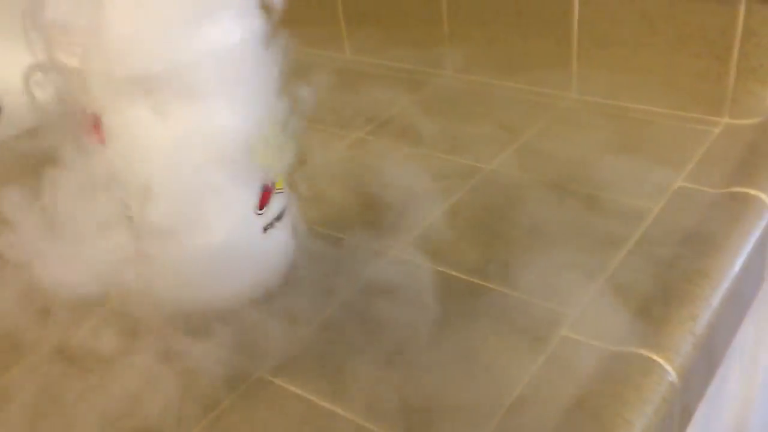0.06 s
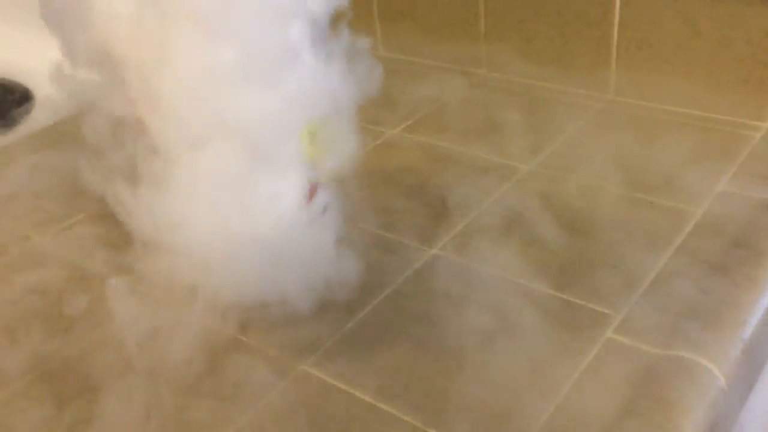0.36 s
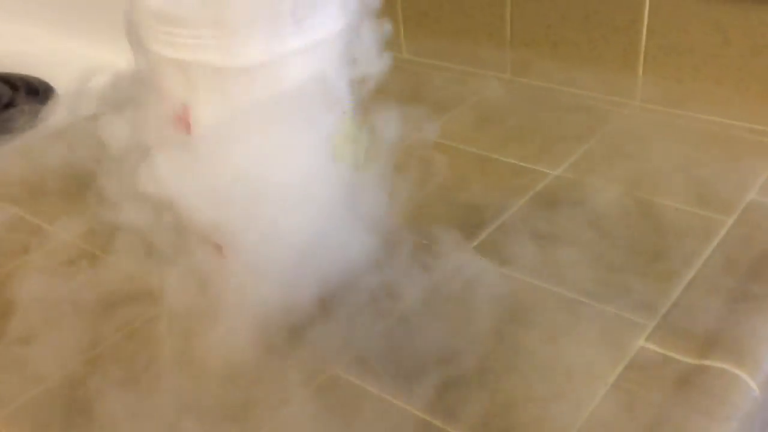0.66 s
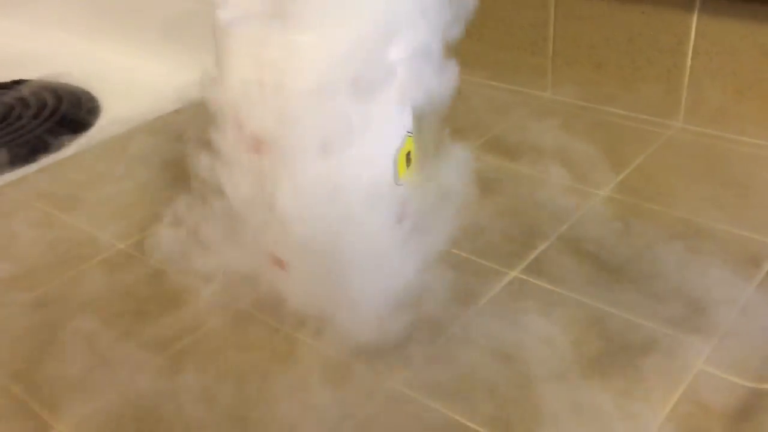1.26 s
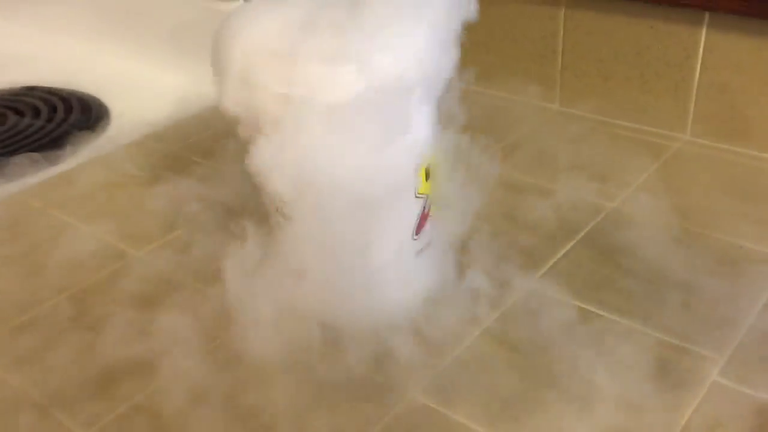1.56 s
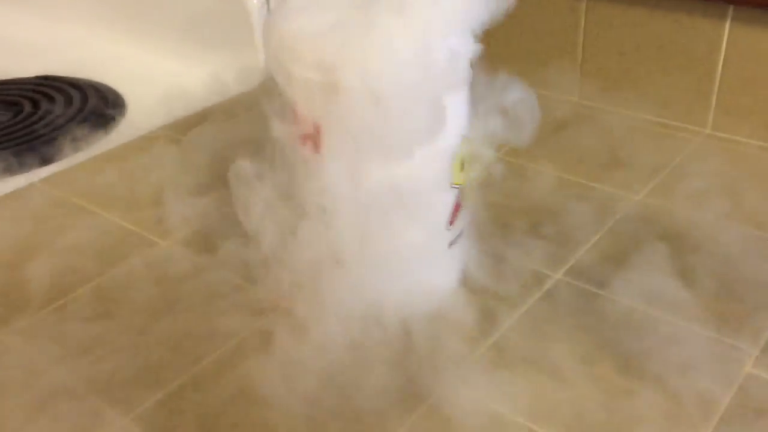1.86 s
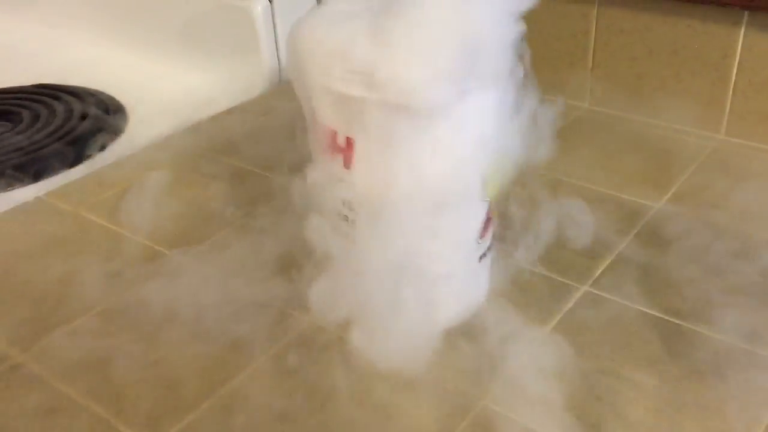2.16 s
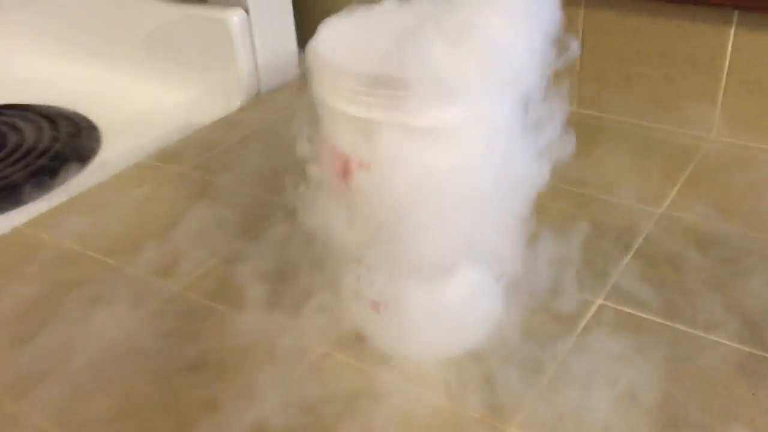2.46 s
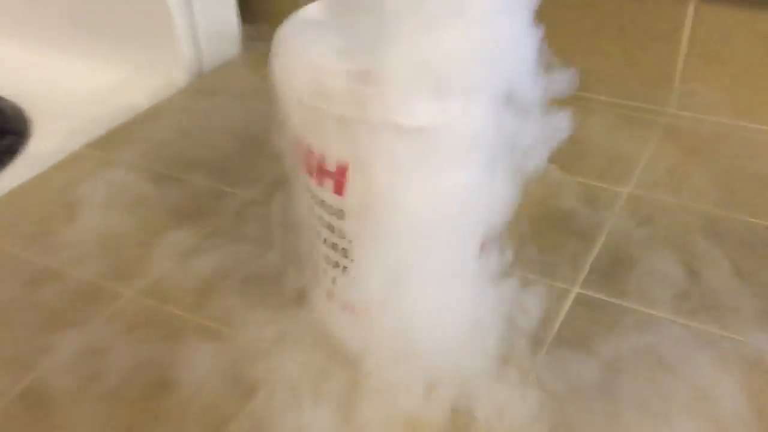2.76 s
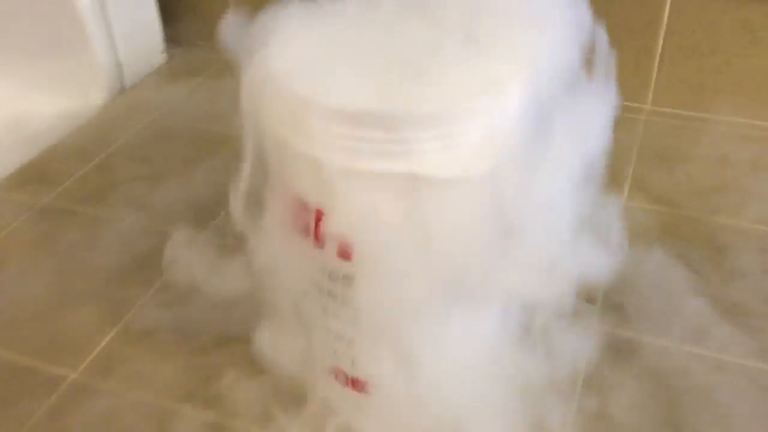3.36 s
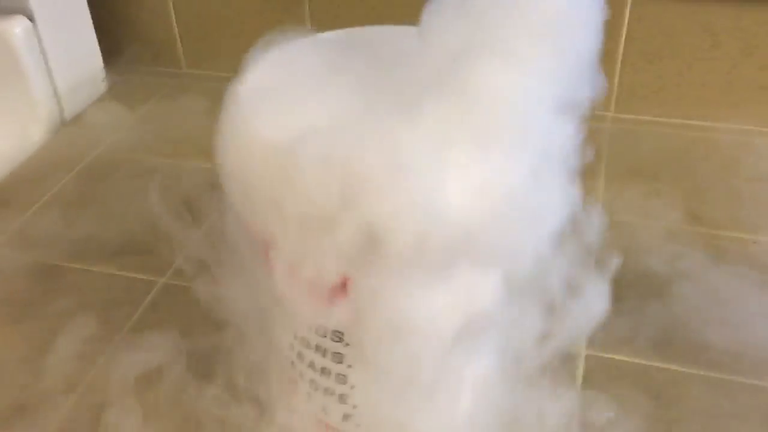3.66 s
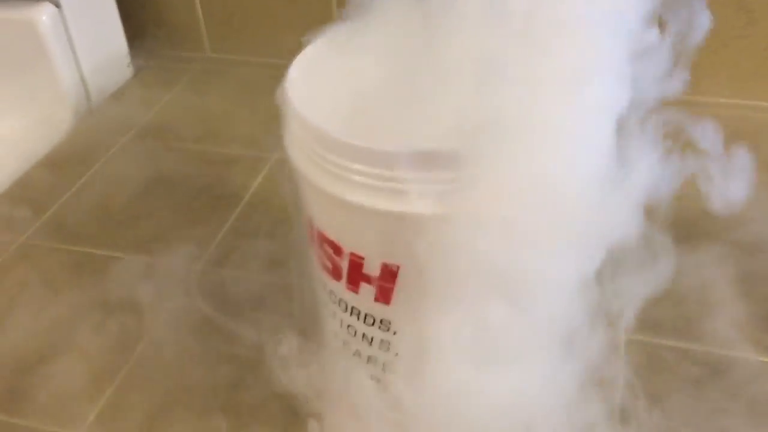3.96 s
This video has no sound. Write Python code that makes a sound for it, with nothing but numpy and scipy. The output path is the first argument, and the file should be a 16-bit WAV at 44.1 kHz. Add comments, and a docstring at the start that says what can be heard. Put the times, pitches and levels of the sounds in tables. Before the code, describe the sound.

Dry ice bubbles continuously in a small plastic bucket of water. Irregular hollow plops stand out from a fine simmer with tiny pops and ticks, over a soft rumble and hiss, heard close in a kitchen.

```python
"""Dry ice bubbles in a small plastic bucket of water on a tiled kitchen counter.
Large gas bubbles burst in short rising plops that make the air in the bucket ring.
Smaller ones simmer between them, bursts throw spatters of tiny pops, and films and droplets tick.
Churning water rumbles softly under a steady hiss, and the kitchen adds a short echo."""
import sys
import numpy as np
from scipy import signal
from scipy.fft import rfft, irfft
from scipy.io import wavfile

SR = 44100
rng = np.random.default_rng(int(sys.argv[2]) if len(sys.argv) > 2 else 0)


def dump(signal):
    """Clip the signal to [-1, 1] and save it as 16-bit WAV at the path in sys.argv[1]."""
    limited = np.clip(np.atleast_2d(signal).T, -1, 1)
    pcm = np.round(limited * 32767).astype(np.int16)
    wavfile.write(sys.argv[1], SR, pcm)


N = 176400
T = np.arange(N) / SR

# low notes of the bucket and counter: pitch_hz, width_hz, level_db
RUMBLE_NOTES = [(64, 20.6, -68.5), (74.3, 11, -67), (119, 10.2, -66.5), (149.7, 10.3, -67),
                (194, 47.5, -69.5), (350, 266, -69)]
# how the deepest of those notes swell and fade: time_s, gain_db
DEEP_SWELL = [(0, -2), (.9, 5), (2.6, 2), (4, -4.5)]
# tone of the background hiss: pitch_hz, gain_db
HISS_TONE = [(30, -28), (250, -2), (450, 0), (650, 0), (850, -5), (2000, -10), (4000, -16), (6000, -20),
             (9500, -22), (12000, -25), (16000, -28)]
# how strongly the small bubbles simmer: time_s, gain_db
SIMMER_STRENGTH = [(0, 0), (.55, -3.5), (.85, -4), (1.15, -2.5), (1.45, 0), (2.2, 2.5), (3.1, -3),
                   (3.33, -1), (3.55, 3.5), (4, 2.5)]
# sharp snaps of films and droplets: start_s, pitch_hz, level_db
FILM_SNAPS = [(0.129, 9300, -56), (0.2468, 5500, -54.5), (0.3285, 9400, -56), (0.3564, 6100, -52.5),
              (0.361, 12400, -51.5), (0.378, 5240, -60.5), (0.546, 6050, -61), (0.689, 7900, -64.5),
              (0.957, 5430, -56), (1.2413, 6200, -58), (1.413, 5550, -55), (1.426, 6600, -55.5),
              (1.538, 8900, -61.5), (1.661, 3940, -51), (1.6643, 12300, -60.5), (1.817, 6500, -60.5),
              (1.871, 9600, -65.5), (2.151, 9200, -61.5), (2.217, 8000, -55.5), (2.297, 8900, -61.5),
              (3.05, 8250, -50), (3.223, 6650, -57.5), (3.406, 9500, -50.5), (3.414, 12500, -65),
              (3.552, 9200, -60), (3.652, 8250, -57.5), (3.886, 8300, -54)]
# large bubbles bursting at the surface: start_s, pitch_hz, level_db (before PLOP_GAIN_DB), swell_s
LARGE_BUBBLES = [(0.2496, 2820, -37.5, 0.00049), (0.3213, 706, -43, 0.0046), (0.3718, 639, -28.5, 0.0032),
                 (0.378, 3750, -41.5, 0.0009), (0.4745, 738, -43.5, 0.0016), (0.483, 1760, -55, 0.002),
                 (0.5028, 480, -43.5, 0.0013), (0.5265, 618, -42.5, 0.0018), (0.591, 784, -44.5, 0.0016),
                 (0.6163, 2620, -43, 0.00028), (0.6591, 1242, -38.5, 0.0013), (0.6698, 630, -42.5, 0.0039),
                 (0.7141, 627, -37, 0.0029), (0.8742, 627, -43.5, 0.0014), (1.02, 649, -48, 0.0064),
                 (1.109, 1180, -58.5, 0.002), (1.178, 4450, -51, 0.0016), (1.3118, 675, -38, 0.0011),
                 (1.325, 960, -51.5, 0.0032), (1.4448, 623, -45.5, 0.0033), (1.6142, 3370, -47, 0.00065),
                 (1.6123, 2430, -45.5, 0.0041), (1.7283, 1967, -46.5, 0.0033), (1.8171, 595, -47.5, 0.0049),
                 (1.844, 706, -33.5, 0.0018), (2.031, 1470, -32, 0.00083), (2.2509, 608, -37, 0.0026),
                 (2.3078, 676, -43.5, 0.0023), (2.3835, 712, -44, 0.0016), (2.4835, 1610, -46, 0.0012),
                 (2.484, 1040, -41.5, 0.0013), (2.5364, 715, -46.5, 0.0019), (2.6207, 655, -35, 0.0037),
                 (2.622, 950, -40.5, 0.0005), (2.702, 2910, -50, 0.0015), (2.7258, 960, -37.5, 0.001),
                 (2.7258, 688, -30, 0.0033), (2.9168, 606, -38, 0.0017), (3.0046, 1116, -41.5, 0.0013),
                 (3.0485, 2570, -43.5, 0.00092), (3.1097, 3270, -39.5, 0.00015),
                 (3.114, 4180, -48.5, 0.0013), (3.1211, 1270, -36, 0.0016), (3.1218, 643, -39, 0.00105),
                 (3.1864, 344, -41.5, 0.0012), (3.2363, 590, -40, 0.0022), (3.4041, 1000, -45.5, 0.0017),
                 (3.4657, 970, -44, 0.0014), (3.4973, 2640, -36, 0.00056), (3.5542, 646, -39.5, 0.0031),
                 (3.5711, 1050, -37.5, 0.0023), (3.6549, 2790, -43.5, 0.00046),
                 (3.652, 1060, -42.5, 0.0014), (3.6991, 905, -46.5, 0.00097), (3.7573, 940, -41, 0.0021),
                 (3.8474, 1120, -38, 0.0012), (3.8736, 635, -38, 0.0024), (3.9483, 664, -46, 0.0044)]
# spatters of tiny pops: middle_s, pitch_hz, top_level_db
POP_SPATTERS = [(0.582, 3800, -48.5), (0.98, 3860, -52), (1.428, 2650, -45.5), (1.848, 1250, -48.5),
                (2.05, 3700, -46.5), (2.258, 3200, -50), (2.459, 1670, -53), (2.633, 4900, -49.5),
                (2.743, 4520, -53.5), (2.852, 5300, -43.5), (3.001, 1476, -48), (3.219, 4740, -45.5),
                (3.622, 3160, -49), (3.758, 2810, -48.5), (3.963, 4330, -51.5)]
# ringing notes of the air in the bucket: pitch_hz, width_hz, gain_db
BUCKET_NOTES = [(666.3, 32.4, -1), (1943, 360, -6), (2723, 33, 0.5), (3760, 166, 2)]

PLOP_GAIN_DB, PLOP_LOW_HZ = 2.5, 290   # the bubbles give off little sound below this pitch
SWELL_SHAPE, FADE_SHAPE = 0.44, 1.31   # curves of a bubble's rise and fall in loudness
POP_GLIDE, SIMMER_GLIDE = 0.016, 0.023   # share of the pitch gained per swell time
SMALL_FLUTTER_RAD = 0.55   # random wobble that makes small bubbles sound rough


def from_db(db):
    """Turn decibels into a number to multiply a sound by."""
    return 10 ** (np.asarray(db) / 20)


def rms_one(x):
    """Scale a sound so its average strength (rms) is 1."""
    return x / np.sqrt(np.mean(x ** 2) + 1e-20)


def add(out, start_s, sound):
    """Mix a sound in at the given time."""
    i = int(np.clip(start_s * SR, 0, N - 1))
    out[i:i + len(sound)] += sound[:N - i]


def resonance(x, hz, width_hz):
    """Let a sound ring at one pitch; a narrower width rings longer."""
    r = np.exp(-np.pi * width_hz / SR)
    feedback = [1, -2 * r * np.cos(2 * np.pi * hz / SR), r * r]
    return signal.lfilter(np.array([1, 0, -1]) * (1 - r * r) / 2, feedback, x + 1e-18)


def rumble(deep_below_hz=105):
    """Churning water shakes the bucket and counter at their low notes."""
    out = np.zeros(N)
    deep_db = np.interp(T, *np.transpose(DEEP_SWELL))
    for hz, width_hz, db in RUMBLE_NOTES:
        churn = resonance(rng.standard_normal(N), hz, 2 * width_hz)
        note = rms_one(resonance(churn, hz, 2 * width_hz))
        out += from_db(db + deep_db * (hz < deep_below_hz)) * note
    return signal.sosfilt(signal.butter(2, 30, "high", fs=SR, output="sos"), out)


def hiss(level_db=-70.5):
    """A far wash of water and room air makes a soft, steady noise."""
    hz, db = np.transpose(HISS_TONE)
    gain = from_db(np.interp(np.log(np.fft.rfftfreq(N, 1 / SR) + 1), np.log(hz), db))
    # turn the tone curve into a filter that rings only after a sound, never before
    cepstrum = irfft(np.log(gain), N)
    cepstrum[1:N // 2] *= 2
    cepstrum[N // 2 + 1:] = 0
    spectrum = rfft(rng.standard_normal(N)) * np.exp(rfft(cepstrum))
    return from_db(level_db) * rms_one(irfft(spectrum, N))


def bubble(hz, swell_s, glide, flutter_rad):
    """One bursting bubble swells as its cap opens, rises in pitch and dies away."""
    age = np.arange(int(6 * swell_s * SR) + 2) / (swell_s * SR)   # 1 at the loudest moment
    loudness = age ** SWELL_SHAPE * np.exp(SWELL_SHAPE / FADE_SHAPE * (1 - age ** FADE_SHAPE))
    wobble = flutter_rad * np.interp(age, np.arange(12) / 2, rng.standard_normal(12))
    rising_hz = hz * (1 + glide * (age - 1))
    return loudness * np.sin(2 * np.pi * np.cumsum(rising_hz) / SR + wobble)


def simmer(count, centre_hz, octaves, db, cycles, trailing=0, steady=False, trail_s=0.025, spread_db=7):
    """Small bubbles burst at random; the trailing share comes just after the large ones."""
    out = np.zeros(N)
    for when, pitch, strength, length, rise, late in rng.uniform(-1, 1, (count, 6)):
        start_s = (when + 1) / 2 * N / SR
        if abs(late) < trailing:
            plop_s = LARGE_BUBBLES[int(abs(when) * len(LARGE_BUBBLES))][0]
            start_s = plop_s + trail_s * abs(late) / trailing
        hz = centre_hz * 2 ** (octaves * pitch)
        gain = from_db(db + spread_db * strength * abs(strength)) * np.sqrt(centre_hz / hz)
        if not steady:
            gain *= from_db(np.interp(start_s, *np.transpose(SIMMER_STRENGTH)))
        swell_s = cycles * 2 ** length / hz
        glide = SIMMER_GLIDE * (1 + 2 * rise)   # a few slide down instead
        add(out, start_s, gain * bubble(hz, swell_s, glide, SMALL_FLUTTER_RAD))
    return out


def tick(hz, decay_s=0.001, width_share=0.17, fringe_db=-5):
    """A tiny film tears: a very short pitched crack with a fringe of wider noise."""
    age = T[:SR // 50] / decay_s
    tear = resonance(rng.standard_normal(len(age)), hz, width_share * hz)
    crack = rms_one(resonance(tear, hz, width_share * hz))
    fringe = rms_one(resonance(rng.standard_normal(len(age)), hz, hz))
    return age * np.exp(1 - age) * (crack + from_db(fringe_db) * fringe)


def snaps(crackle_s=0.02, octaves=0.6):
    """Each film snaps with a tick, then four droplets crackle more weakly at other pitches."""
    out = np.zeros(N)
    for start_s, hz, db in FILM_SNAPS:
        add(out, start_s, from_db(db) * tick(hz))
        for late, pitch in rng.random(size=(4, 2)):
            droplet = tick(hz * 2 ** (octaves * (2 * pitch - 1)))
            droplet_db = db - 11 * (0.5 + late)   # later ones are quieter
            add(out, start_s + crackle_s * late, from_db(droplet_db) * droplet)
    return out


def plops():
    """Large bubbles burst at the surface, one by one."""
    out = np.zeros(N)
    for start_s, hz, db, swell_s in LARGE_BUBBLES:
        flutter_rad = 0.45 * hz / 3000   # a smaller, higher bubble has a rougher splat
        add(out, start_s, from_db(db + PLOP_GAIN_DB) * bubble(hz, swell_s, POP_GLIDE, flutter_rad))
    return signal.sosfilt(signal.butter(2, PLOP_LOW_HZ, "high", fs=SR, output="sos"), out)


def spatters(spread_s=0.011, octaves=0.39, cycles=1.99, range_db=16):
    """Bursting bubbles throw spatters of eight tiny pops, close in time and pitch."""
    out = np.zeros(N)
    for middle_s, centre_hz, db in POP_SPATTERS:
        for when, pitch, strength in rng.uniform(-1, 1, size=(8, 3)):
            hz = centre_hz * 2 ** (octaves * pitch)
            pop = bubble(hz, cycles / hz, POP_GLIDE, SMALL_FLUTTER_RAD)
            add(out, middle_s + spread_s * when, from_db(db - range_db * abs(strength)) * pop)
    return out


def walls(x, decay_s=0.002, echo_db=-3):
    """Echoes between the bucket's walls smear each tiny pop over a few milliseconds."""
    t = T[:SR // 50]
    echoes = rng.standard_normal(len(t)) * np.exp(-t / decay_s)
    return x + from_db(echo_db) * signal.fftconvolve(x, echoes / np.linalg.norm(echoes))[:N]


def bucket_air(x):
    """The bubbles make the air in the bucket ring at its own notes."""
    return sum(from_db(db) * resonance(x, hz, width_hz) for hz, width_hz, db in BUCKET_NOTES)


def kitchen(x, echo_db=-9.5, delay_s=0.0012, split_hz=4500, low_fade_s=0.23, high_fade_s=0.068):
    """Sound bounces off tiles and walls; the highs die first. A fade time is a fall of 60 dB."""
    t = T[:SR // 2]
    noise = rng.standard_normal(len(t)) * (t > delay_s)
    low = signal.sosfilt(signal.butter(1, split_hz, fs=SR, output="sos"), noise)
    tail = low * from_db(-60 * t / low_fade_s) + (noise - low) * from_db(-60 * t / high_fade_s)
    return from_db(echo_db) * signal.fftconvolve(x, tail / np.linalg.norm(tail))[:N]


def scene():
    """Bubbles ring in the bucket and echo in the kitchen, over the rumble and hiss."""
    large = plops()
    spray = simmer(count=1500, centre_hz=8600, octaves=0.75, db=-76.5, cycles=2.6)
    small = spatters() + snaps() + walls(spray)
    small += simmer(count=170, centre_hz=443.5, octaves=0.543, db=-61.5, cycles=1.4)
    small += simmer(count=260, centre_hz=635.7, octaves=0.13, db=-54, cycles=2.17, steady=True)
    small += walls(simmer(count=900, centre_hz=1452, octaves=0.47, db=-67.5, cycles=1.91, trailing=0.3))
    small += walls(simmer(count=1000, centre_hz=3089, octaves=0.693, db=-72, cycles=2.62, trailing=0.3))
    ringing = bucket_air(small + from_db(-7) * large)   # surface bursts stir the bucket less
    bubbles = large + small
    return (bubbles + ringing + hiss() + kitchen(bubbles) + rumble())[None]


def record(dry, cutoff_hz=16200):
    """Cut away the very highest sounds steeply."""
    return signal.sosfilt(signal.ellip(10, 0.1, 70, cutoff_hz, fs=SR, output="sos"), dry)


dry = scene()
out = record(dry)
dump(out)
```